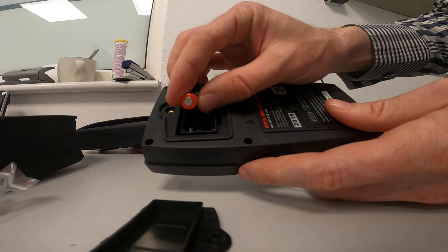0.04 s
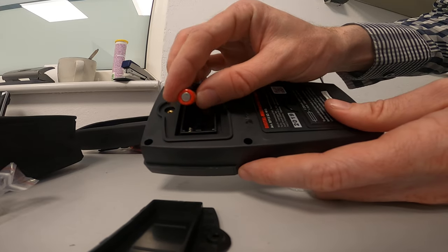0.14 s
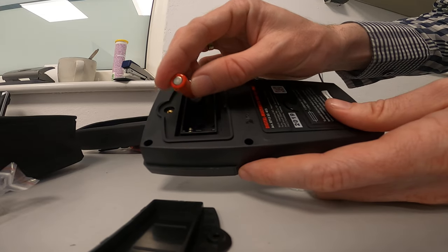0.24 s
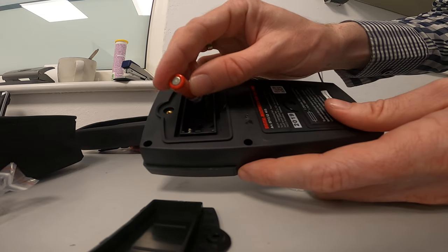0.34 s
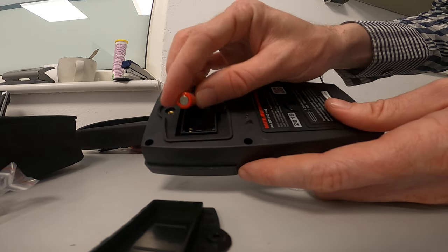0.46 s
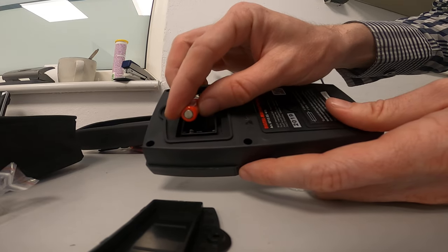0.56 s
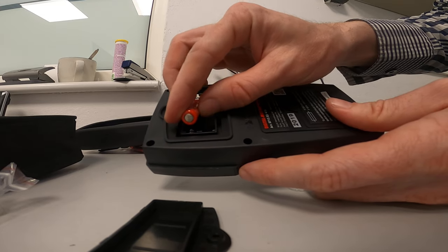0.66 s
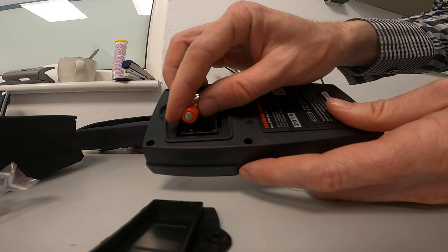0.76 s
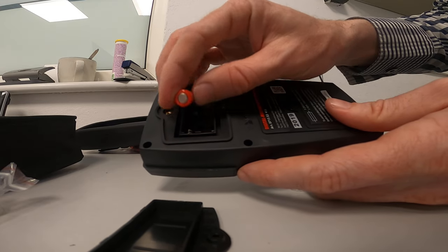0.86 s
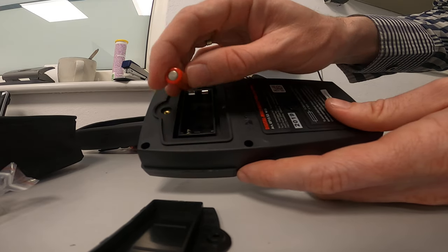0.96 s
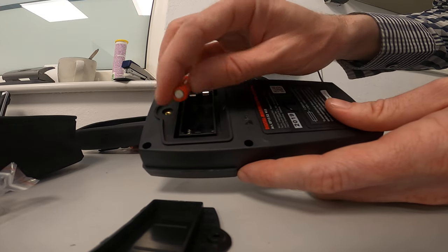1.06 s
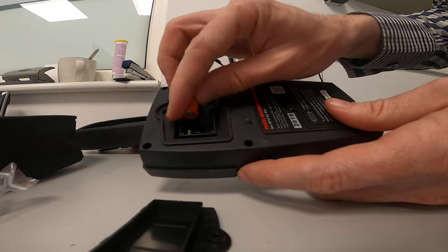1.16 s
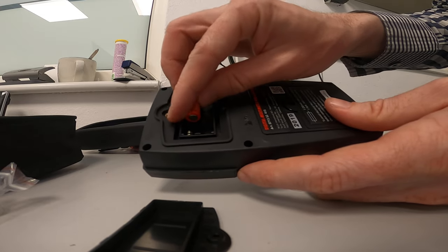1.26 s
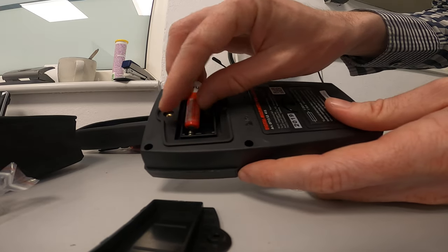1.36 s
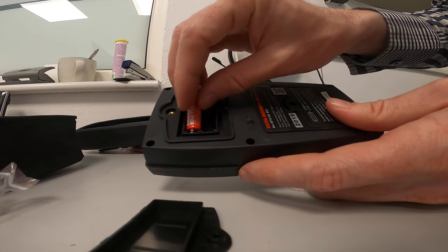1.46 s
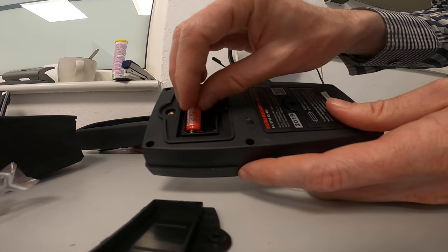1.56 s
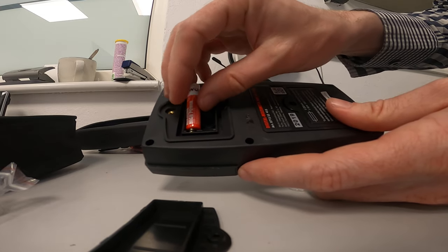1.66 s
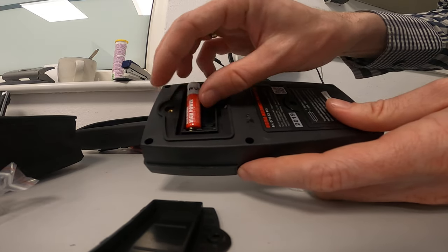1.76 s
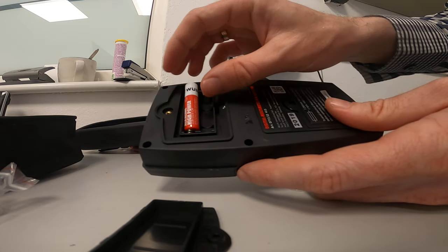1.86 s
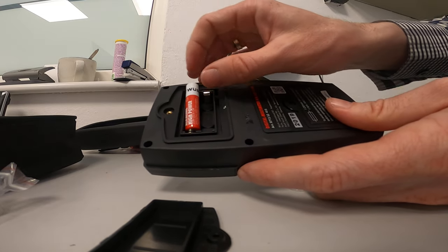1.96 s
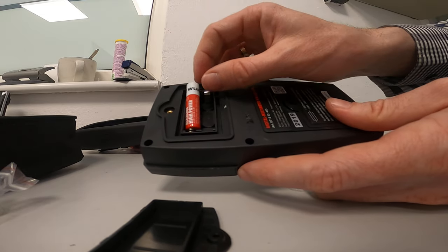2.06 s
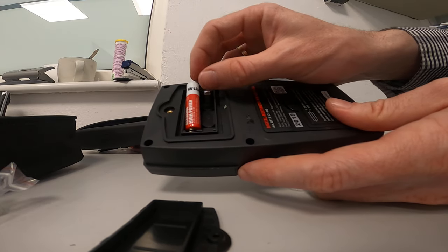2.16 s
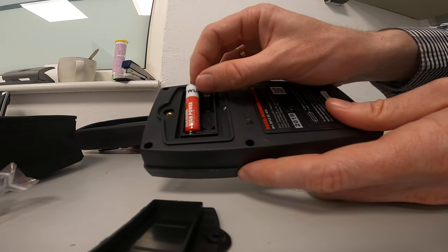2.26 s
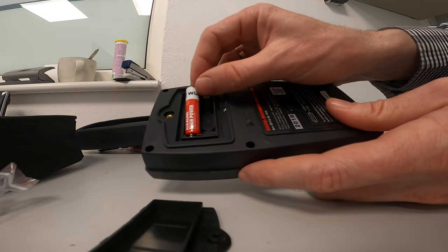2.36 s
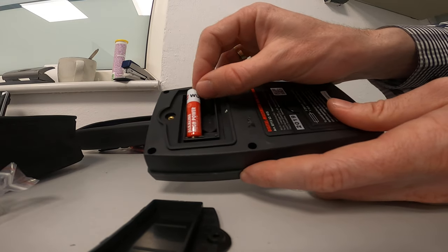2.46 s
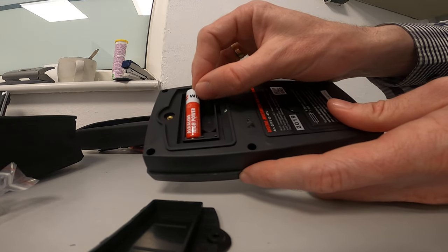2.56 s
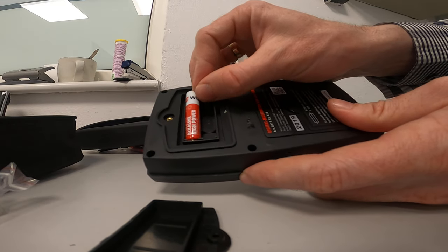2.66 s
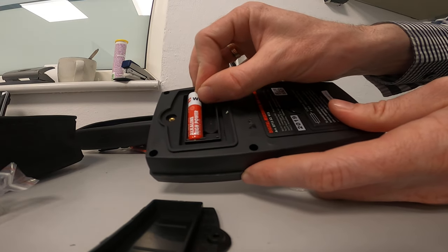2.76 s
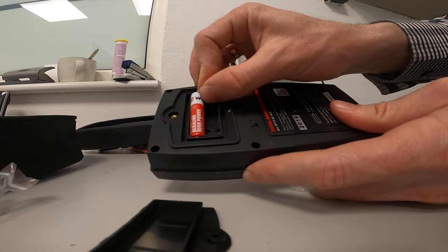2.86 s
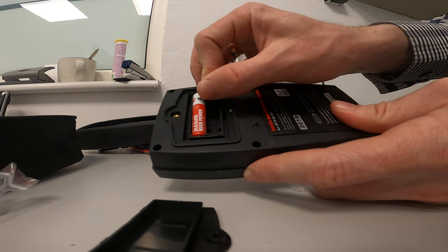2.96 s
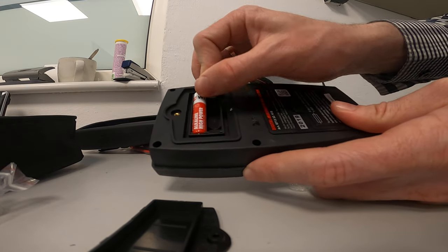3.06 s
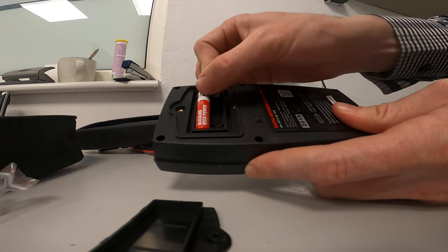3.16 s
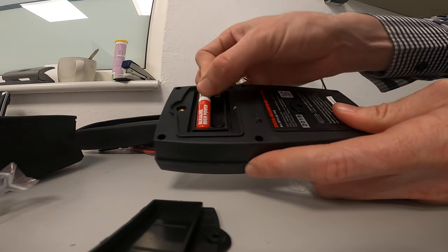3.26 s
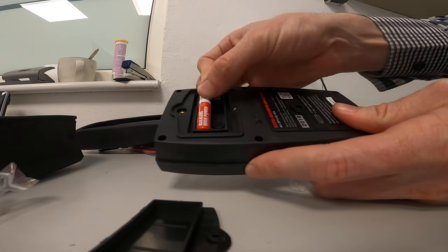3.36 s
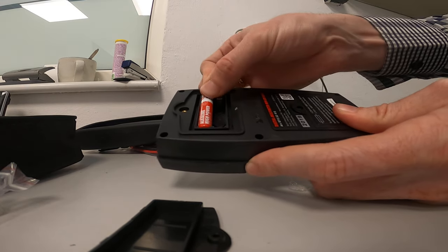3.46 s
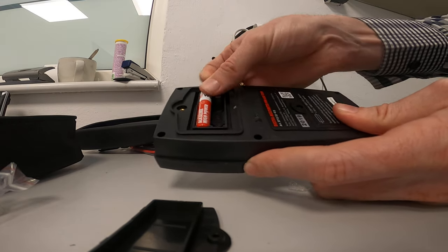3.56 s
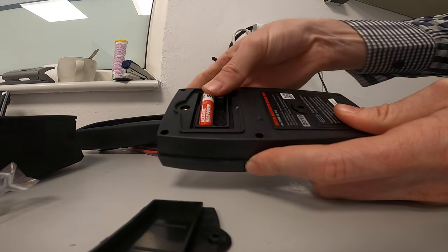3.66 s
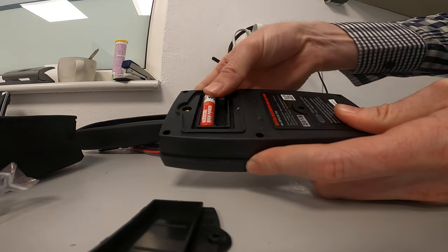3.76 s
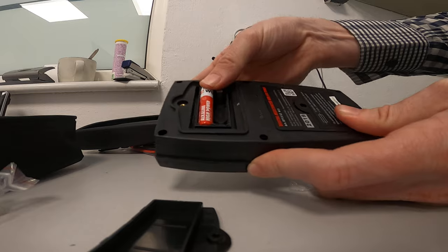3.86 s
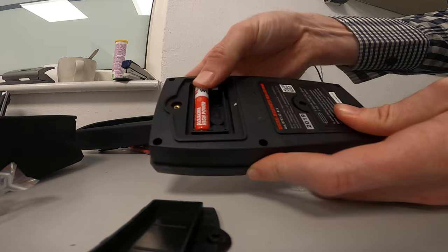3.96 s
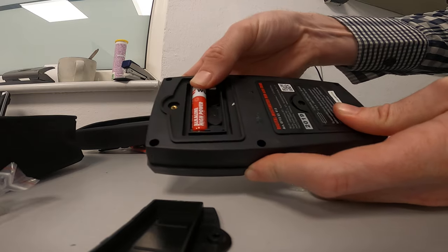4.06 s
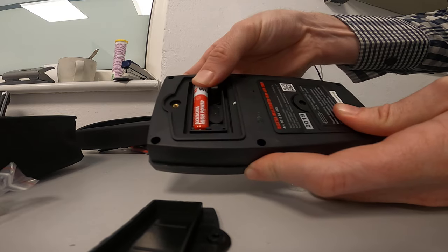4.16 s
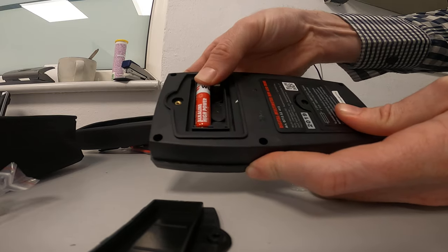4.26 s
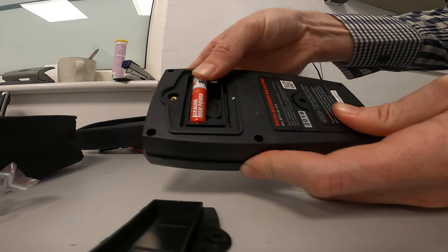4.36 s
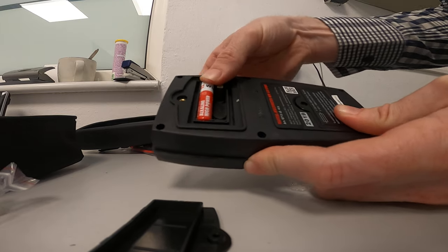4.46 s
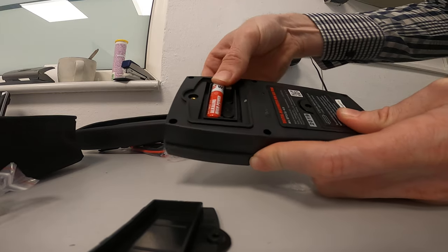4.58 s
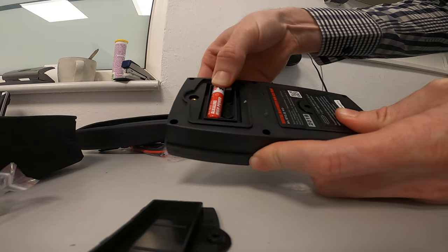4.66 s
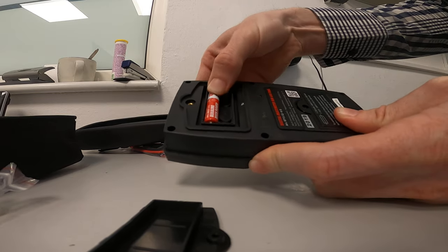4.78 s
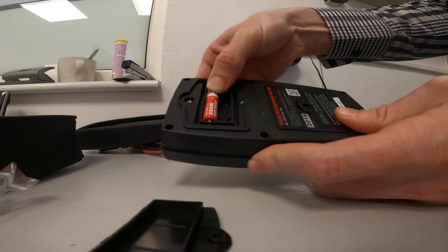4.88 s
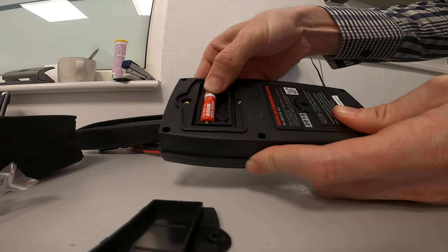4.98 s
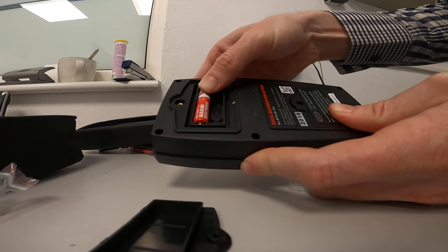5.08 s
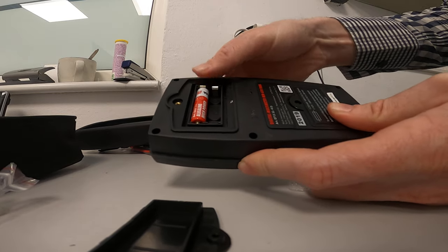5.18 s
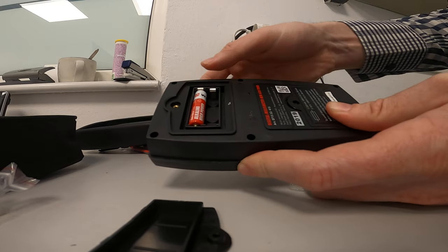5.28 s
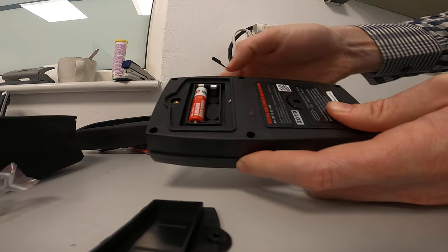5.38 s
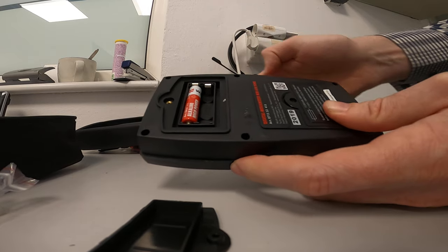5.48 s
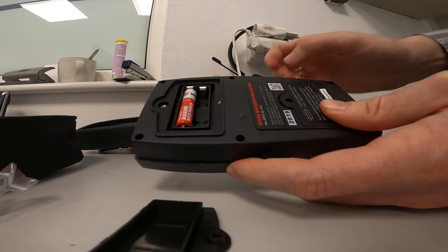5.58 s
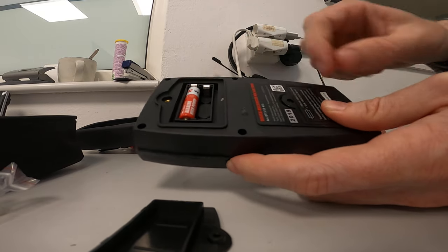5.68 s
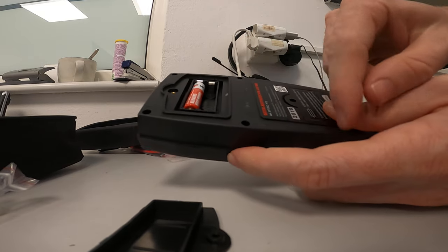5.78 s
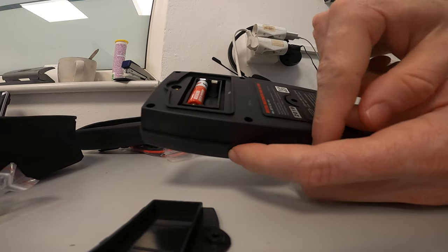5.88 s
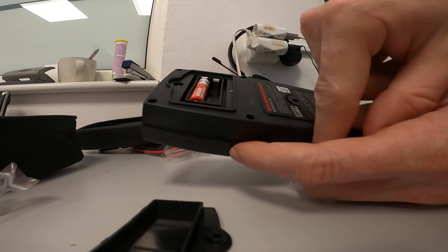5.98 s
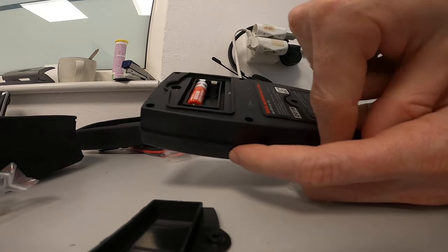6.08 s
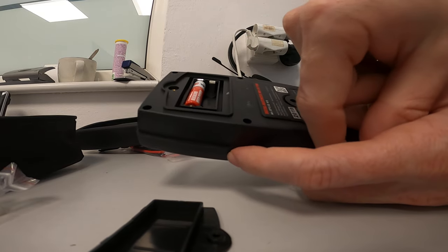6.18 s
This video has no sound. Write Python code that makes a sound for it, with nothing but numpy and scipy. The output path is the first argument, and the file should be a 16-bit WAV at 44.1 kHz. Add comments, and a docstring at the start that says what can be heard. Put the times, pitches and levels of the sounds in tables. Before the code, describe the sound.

A close stereo microphone in a small, hard room hears faint ventilation, a wavering low hum and soft rumble from hands on a plastic device. Light battery taps and faint scrapes open, until a brighter cluster of clicks at about 1 s. From 1.3 to 1.6 s come hollow knocks, gritty rubs and two or three firm clacks, then a hard clack at 1.85 s with a short slide. It is quieter until 2.7 s; moderate clicks follow near 2.95, 3.1 and 3.4 s. Small rubs and ticks continue around 4 s, with firmer clicks near 4.5 s and scraping to 4.8 s as rumble rises. At 4.87 s rapid slips grow into a huge dry snap at 4.91 s, with metallic edge and low desk thud. The background ducks, the room tail hangs for about half a second, then only sparse faint ticks and rubs remain, with rumble swelling after 5.6 s.

```python
"""A battery is tried in the compartment of a plastic handheld device, close to a camera on a desk in a small room.
Over faint ventilation, hum and hand rumble it taps and slides on the case, as struck modes and filtered noise,
and narrow bands of noise swell briefly. Shortly before 5 s a thumb pushes it along the spring in quick, growing
slips, and it seats with one sharp snap, which shakes the desk and ducks the camera's limiter, so the room's ring
seems to hang on after it. A few faint rubs and ticks of the hands follow while the rumble swells again."""
import sys
import numpy as np
from scipy import signal
from scipy.fft import rfft, irfft
from scipy.io import wavfile
from scipy.ndimage import uniform_filter1d, minimum_filter1d

SR = 44100
rng = np.random.default_rng(int(sys.argv[2]) if len(sys.argv) > 2 else 0)


def inscribe(sig):
    """Save sig as 16-bit PCM at rate SR to the path in sys.argv[1].

    A 1-D sig is mono; a 2-D sig holds one channel per row.
    Samples are clipped to [-1, 1] before scaling.
    """
    pcm = np.round(np.clip(np.atleast_2d(sig).T, -1, 1) * 32767)
    wavfile.write(sys.argv[1], SR, pcm.astype(np.int16))


N = 274743
TIME = np.arange(N) / SR

# Walls of the plastic case. Each row: mode in Hz, energy in dB, t60 in seconds.
CASE_MODES = [(362.7, -7, .012), (540, -13, .031), (700, 1, 0.14), (758, -4, 0.22), (866, -6, 0.011),
              (1018, -1.5, .025), (1105, 0.5, 0.03), (1210, -2.5, .035), (1350, -6, 0.02),
              (1505, -1.5, 0.023), (1670, -2.5, 0.026), (1765, -3, .02), (2054, -0.5, 0.018),
              (2245, -5, .02), (2615, -5, 0.02), (2854, 0, 0.02), (3130, -3, 0.013), (3580, -1.5, 0.015),
              (3882, -3, 0.022), (4243, -2, 0.023)]


def undb(db):
    """Decibels to gain."""
    return 10 ** (np.asarray(db) / 20)


def unit(x):
    """Scale to rms 1."""
    return x / np.sqrt(np.mean(x ** 2))


def strong(y):
    """Scale to the energy of 10 ms at rms 1."""
    return y * np.sqrt(SR / 100 / np.sum(y ** 2))


def add(track, s, sound):
    """Mix a sound into a track at time s."""
    i = int(s * SR)
    track[..., max(i, 0):i + sound.shape[-1]] += sound[..., max(-i, 0):N - i]


def colour(x, points):
    """Filter by (Hz, dB) points, joined by straight lines over log frequency."""
    hz, db = np.transpose(points)
    f = np.maximum(np.fft.rfftfreq(x.shape[-1], 1 / SR), 1)
    gain = undb(np.interp(np.log(f), np.log(hz), db))
    return irfft(rfft(x) * gain, x.shape[-1])


def fade(t, t60):
    """Exponential decay by 60 dB in t60 seconds."""
    return np.exp(-np.log(1000) * t / t60)


def bell(t, length):
    """A level that swells and dies around the middle of t."""
    return np.exp(-2 * ((t - t.mean()) / length) ** 2)


def ring(modes, weights, scatter_db, detune, in_step=.4, size=6144):
    """Struck modes; each contact point shifts their shares and pitches and flips a few."""
    hz, db, t60 = np.transpose(modes)[:, :, None]
    t = np.arange(size) / SR
    share, shift, side = rng.standard_normal((3, len(modes), 1))
    polarity = np.sign(side + in_step)
    gain = weights * undb(db + scatter_db * share) * polarity / np.sqrt(t60)
    tones = np.sin(2 * np.pi * hz * (1 + detune * shift) * t)
    return strong(np.sum(gain * fade(t, t60) * tones, axis=0))


def outline(x, modes, weights):
    """Colour x with the smooth outline of a set of modes, without the notches between them."""
    hz, db, _ = np.transpose(modes)
    db = db + 20 * np.log10(np.ravel(weights))
    below = (hz[0] / 2, db[0] - 22.5)
    above = [(hz[-1] * 1.3, db[-1] - 20.0), (hz[-1] * 3, db[-1] - 45.0)]
    return strong(colour(x, [below, *zip(hz, db), *above]))


def reach(centre_hz, spread):
    """Share of each case mode in a contact: soft ones reach the low modes, hard ones the high."""
    octaves = np.log2(np.array(CASE_MODES)[:, :1] / centre_hz)
    return (1 + octaves ** 2 / (3.1 * spread ** 2)) ** -1.5


def effort(ease_s=0.18):
    """Rise of the rumble in dB, easing in and out of each movement of the hands."""
    # The hands move or press. Each row: start in seconds, end in seconds, rise of the rumble in dB.
    moves = [(0, .9, 3), (3.69, 4.9, 5), (5.599, 6.3, 4.5)]
    held = sum(db * ((TIME >= start) & (TIME < end)) for start, end, db in moves)
    return uniform_filter1d(1. * held, int(ease_s * SR))


def background(air_db=-73, wander_db=1.8, rest_db=-51.5, grip_db=-57, grip_growth=1.4):
    """Faint ventilation with a wavering hum, and the rumble of hands holding the case on the desk."""
    # Ventilation before its bass is trimmed. Each row: frequency in Hz, density in dB per Hz.
    air_shape = [(12, -29.5), (20, -1.5), (140, -9.5), (171, -12), (202, -16), (393, -28), (452, -36),
                 (565, -39), (725, -35.5), (932, -38.5), (1670, -40.5), (1820, -37), (2400, -44.5),
                 (4200, -54.5), (7730, -56), (10500, -77), (15500, -98)]
    # Steady lines of the hum. Each row: frequency in Hz, rms level in dB.
    hum_lines = [(147, -62.5), (197, -65.5), (506, -83), (743, -83)]
    # Colour of the hand rumble. Each row: frequency in Hz, gain in dB.
    rumble_shape = [(15, -4.5), (30, 0), (62, 0), (85, -10), (150, -14), (230, -29), (400, -39),
                    (1000, -72)]
    mid, side = rng.standard_normal((2, N))
    side = colour(side, [(100, -15.5), (600, -1.0), (2500, 0)]) * np.array([[1], [-1]])
    air = colour(colour(mid + side, air_shape), [(90, -15.5), (220, -4.0)])
    # the level counts only what lies above 400 Hz
    air *= undb(air_db) / np.std(colour(air.mean(axis=0), [(350, -80), (400, 0)]))
    hum = 0
    for hz, db in hum_lines:
        waver = unit(colour(rng.standard_normal(N), [(4, -2.0), (12, -9.0), (60, -62.5)]))
        hum = hum + undb(db) * unit((1 + .5 * waver) * np.sin(2 * np.pi * hz * TIME))
    # the rumble also swells and sinks by chance
    wander = unit(colour(rng.standard_normal(N), [(4, 1), (8, -11), (30, -71)]))
    rise = effort() + wander_db * wander
    shared = undb(rest_db + rise) * unit(colour(rng.standard_normal(N), rumble_shape))
    # the gripping hand is on the right and grows faster with effort
    grip = undb(grip_db + grip_growth * rise) * unit(colour(rng.standard_normal(N), rumble_shape))
    return air + hum + np.array([shared, shared + grip])


def room(x, build_s=0.0055, left_db=1, right_db=-1):
    """Diffuse echoes, dying sooner in the high treble; long waves reach both ports alike."""
    # Echo bands, before the balance of the ports. Each row: centre in Hz, echo level in dB, t60 in seconds.
    echo_bands = [(150, -9.5, .5), (342, -2.5, 0.68), (654, -8, 0.64), (940, -12.5, .66),
                  (1190, -17.5, .62), (1630, -13, .69), (2040, -16.5, .64), (2400, -20, .6),
                  (3740, -19, 0.57), (4500, -26, 0.69), (5030, -13, .55), (5800, -8.5, .55),
                  (6600, -18, .48), (7500, -19, 0.44), (9000, -29, 0.35), (14970, -30.5, 0.34)]
    hz, db, t60 = np.transpose(echo_bands)
    t, f = np.arange(SR) / SR, np.maximum(np.fft.rfftfreq(SR, 1 / SR), 1)
    mid, side = rfft(rng.standard_normal((2, SR)))
    alike = np.sinc(f / 4500)
    opposite = np.array([[1], [-1]]) * side * np.sqrt(1 - alike)
    field = (mid * np.sqrt(1 + alike) + opposite) / np.sqrt(2)
    echo = 0
    for k, band in enumerate(np.eye(len(hz))):
        shape = fade(t, t60[k]) * (1 - np.exp(-(t / build_s) ** 2))
        noise = irfft(field * np.interp(np.log(f), np.log(hz), band), SR)
        echo = echo + noise * undb(db[k]) * shape / np.linalg.norm(shape)
    wet = signal.fftconvolve(x[None], echo, axes=1)[:, :N]
    return wet * undb([[left_db], [right_db]])


def desk(snap_s=4.9095, sway_left_db=-4.0, jolt_s=4.9135, jolt_hz=135, jolt_db=11, jolt_width_s=.0036,
         left_share=0.06, seat_hz=420, seat_db=2, seat_t60=0.012):
    """Pushes rock the desk; the snap also jolts the camera with one short thud, mostly on the right."""
    # Modes of the desk. Each row: frequency in Hz, level in dB, t60 in seconds.
    desk_modes = [(31.04, -3, 0.24), (64.5, -4.5, 0.18), (100.2, -8, 0.07)]
    # Knocks passed through the hand into the desk. Each row: start in seconds, gain of the sway in dB.
    pushes = [(.02, -40), (2.951, -35), (3.377, -34), (3.69, -41.5), (3.979, -34), (4.07, -38),
              (4.512, -38), (4.545, -35.5), (4.91, 3.5), (5.698, -39)]
    out, t = np.zeros((2, N)), np.arange(SR // 2) / SR
    sway = sum(undb(db) * fade(t, t60) * np.sin(2 * np.pi * hz * t) for hz, db, t60 in desk_modes)
    for s, db in pushes:
        add(out, s, -undb(db) * sway)
    # the battery's whole mass hits the bottom of its bay with a low knock
    add(out, snap_s, undb(seat_db) * fade(t, seat_t60) * np.sin(2 * np.pi * seat_hz * t))
    since = TIME - jolt_s
    jolt = np.exp(-(since / jolt_width_s) ** 2) * np.cos(2 * np.pi * jolt_hz * since)
    return out * undb([[sway_left_db], [0]]) + undb(jolt_db) * jolt * np.array([[left_share], [1]])


def narrow_bands():
    """Narrow bands of noise, each swelling and dying around its middle."""
    # Each row: middle in seconds, length in seconds, centre in Hz, width in Hz, level in dB.
    noise_bands = [(0.529, 0.003, 2800, 500, -61.5), (.56, 0.042, 2900, 900, -75),
                   (.6, 0.022, 2020, 600, -64.5), (.945, 0.05, 1060, 127, -62.5),
                   (1.514, 0.014, 8500, 1800, -63), (1.56, .02, 8500, 1600, -56),
                   (1.795, 0.018, 8400, 1197, -65.5), (1.92, 0.0224, 8740, 1585, -59.5),
                   (2.68, 0.11, 390, 220, -64.5), (4.294, .03, 950, 450, -63),
                   (4.902, 0.016, 7940, 121, -40.5), (5.98, 0.084, 1050, 300, -65.5),
                   (6.0, 0.057, 12500, 4000, -78)]
    out, t = np.zeros(N), np.arange(SR // 3) / SR
    f = np.fft.rfftfreq(len(t), 1 / SR)
    for s, length, hz, width_hz, db in noise_bands:
        swell = bell(t, length)
        band_gain = 1 / (1 + (2 * (f - hz) / width_hz) ** 2)
        noise = irfft(rfft(rng.standard_normal(len(t))) * band_gain, len(t))
        add(out, s - t.mean(), undb(db) * unit(swell * noise) * np.sqrt(np.mean(swell ** 2)))
    return out


def rubs(slips_per_s=1700, uneven_db=2.8, grain_db=3.0, spread=0.61, hiss_left_db=-2, hiss_right_db=2):
    """Uneven tiny slips ring the case while the skin hisses; each stroke swells and dies."""
    # Battery and fingers sliding on the case. Each row: middle in seconds, length in seconds,
    # scrape level in dB, centre of colour in Hz, hiss level in dB before the balance of the ports.
    strokes = [(0.341, 0.043, -64, 1690, -87), (0.645, 0.0067, -50.5, 2100, -77),
               (0.65, 0.04, -60.5, 1700, -92), (0.993, 0.061, -57, 1780, -70),
               (1.517, 0.012, -44, 1150, -72), (1.557, 0.025, -44, 1100, -71),
               (1.82, 0.048, -57.5, 1470, -68), (1.922, 0.033, -50, 1700, -67),
               (2.601, 0.021, -64, 2080, -76.5), (2.731, 0.02, -53.5, 1200, -78),
               (2.955, 0.009, -44, 900, -68.5), (3.095, 0.011, -50.5, 1490, -68),
               (3.404, 0.081, -61, 970, -71), (3.677, 0.012, -51, 3010, -57), (3.684, 0.036, -58, 900, -68),
               (3.903, 0.016, -52.5, 1050, -68), (3.961, 0.091, -59.5, 1500, -73),
               (4.076, 0.02, -54, 950, -70), (4.295, 0.039, -65, 1344, -75.5),
               (4.49, 0.018, -56.5, 1296, -68), (4.547, 0.022, -51.5, 895, -64),
               (4.67, 0.055, -52.5, 1800, -64), (4.761, 0.046, -52.5, 1200, -69.5),
               (5.49, 0.13, -67, 1795, -77), (5.326, 0.021, -67, 1500, -70),
               (5.987, 0.12, -66.5, 1196, -74.5)]
    # Colour of skin and label friction. Each row: frequency in Hz, gain in dB.
    skin_shape = [(1500, -23), (3000, -9.5), (4500, 5), (6500, -1), (8300, 1.5), (10000, -12.5),
                  (13000, -22.5), (16000, -15)]
    out = np.zeros((2, N))
    t = np.arange(SR // 3) / SR
    for s, length, scrape_db, centre_hz, hiss_db in strokes:
        stroke = bell(t, length)
        pressure = undb(uneven_db * unit(colour(rng.standard_normal(len(t)), [(60, 1), (250, -40)])))
        size = pressure * undb(grain_db * np.minimum(rng.exponential(size=len(t)), 3.5))
        lets_go = rng.random(len(t)) < slips_per_s / SR
        slips = lets_go * size * np.sign(rng.standard_normal((2, len(t))))
        # the contact point wanders, so the slips take the broad colour of the case
        body = outline(slips[0], CASE_MODES, reach(centre_hz, spread))
        body = colour(body, [(2300, 0.5), (4000, -7.0)])
        skin = colour(unit(slips) + rng.standard_normal(slips.shape), skin_shape)
        hiss = undb(hiss_db) * unit(stroke * skin) * undb([[hiss_left_db], [hiss_right_db]])
        scrape = undb(scrape_db) * unit(stroke * body)
        add(out, s - t.mean(), (scrape + hiss) * np.sqrt(np.mean(stroke ** 2)))
    return out


def knocks():
    """The hollow of the case rings on after the battery lands squarely."""
    # Hollow inside of the case. Each row: mode in Hz, energy in dB, t60 in seconds.
    hollow_modes = [(527.7, -7.5, .13), (700, -5, .18), (777, -6, .2), (926, -1.5, .13), (1055, -10, 0.17),
                    (1170, -5.5, .07), (1380, -9, 0.056), (1500, -13, .12)]
    # Square landings. Each row: start in seconds, level in dB over 10 ms.
    landings = [(1.341, -36.5), (1.449, -48), (1.541, -41), (1.853, -37.5), (2.954, -51), (3.372, -39.5),
                (3.977, -57)]
    out = np.zeros(N)
    for s, db in landings:
        add(out, s, undb(db) * ring(hollow_modes, 1, scatter_db=0.6, detune=.002, size=11025))
    return out


def pings(split_hz=45):
    """The struck spot of battery, spring or bay rings as a close pair of modes that beat."""
    # Each row: start in seconds, pitch in Hz, level of the stronger mode in dB, t60 in seconds.
    struck_spots = [(.003, 5410, -50, .12), (.003, 1840, -42.5, .02), (.1137, 2020, -43.5, .02),
                    (0.346, 5700, -64, 0.063), (0.9695, 1896, -29, 0.031), (0.9698, 2870, -32, 0.038),
                    (0.9694, 5200, -44.5, 0.048), (1.57, 1180, -26.5, 0.028), (1.57, 3860, -32.5, .028),
                    (1.853, 3200, -34.5, .016), (1.854, 3780, -31, 0.043), (1.853, 4400, -37, 0.045),
                    (1.853, 6680, -49, .08), (2.9542, 3940, -43, 0.011), (3.106, 1170, -27, 0.028),
                    (3.1057, 2630, -32.5, .011), (3.3718, 2540, -36.5, .011), (3.3716, 10140, -35, 0.0058),
                    (4.5047, 2920, -33, 0.011)]
    out, t = np.zeros(N), np.arange(SR // 2) / SR
    for s, hz, db, t60 in struck_spots:
        pair = np.sin(2 * np.pi * hz * t) + 0.47 * np.sin(2 * np.pi * (hz + split_hz) * t)
        add(out, s, undb(db) * fade(t, t60) * pair)
    return out


def contacts(held_t60_s=0.97, pressed_t60_s=0.02, faint_per_s=2.4, faint_db=-69.5, faint_range_db=2,
             faint_hz=1405, faint_tick_db=-15):
    """Every touch of the battery: single clicks, the snap with the slips before it, and faint ticks at random."""
    # Battery against case. Each row: start in seconds, level in dB, centre of colour in Hz,
    # metal tick in dB relative to that level.
    taps = [(0.0033, -48, 2600, -7), (0.1137, -51, 1520, -10.5), (0.3015, -60, 1320, -32),
            (0.3457, -51, 1650, -12), (0.623, -59, 1550, -40), (0.6732, -57, 1770, -43),
            (0.76, -62, 1540, -48), (0.9695, -35, 1640, -13), (0.9819, -37, 1710, -10),
            (0.9882, -36, 1630, -20), (1.0508, -53, 1860, -6.5), (1.34, -38.5, 1120, -34.5),
            (1.345, -43.5, 1150, -54), (1.4485, -40, 1330, -22), (1.467, -59.5, 1700, -7),
            (1.481, -56.5, 1460, -10), (1.5225, -43, 1308, -11), (1.5406, -23, 1100, -33),
            (1.5484, -26.5, 1170, -33), (1.57, -23.5, 1840, -26), (1.81, -60, 2200, 0.5),
            (1.843, -52, 2600, -18), (1.853, -20, 2050, -27), (2.278, -69, 2296, -12),
            (2.397, -61, 718, -25.5), (2.602, -60.5, 2300, -17.5), (2.731, -50.5, 1150, -32),
            (2.772, -58.5, 1260, -37), (2.8732, -67, 2710, 8.5), (2.9512, -43, 1200, -21.5),
            (2.9543, -39, 1080, -21), (3.0548, -49, 1100, -37), (3.084, -50, 1200, -25),
            (3.1057, -34.5, 1810, -19), (3.213, -56.5, 1090, -44.5), (3.3088, -57, 1122, -19),
            (3.3718, -34, 1410, -8), (3.5651, -58.5, 1524, -10.5), (3.733, -63.5, 1690, -10),
            (3.902, -52, 1200, -25), (3.909, -56, 1394, -16), (3.9757, -43.5, 2100, -10.5),
            (4.074, -53, 1200, -16.5), (4.0815, -51.5, 1307, -18.5), (4.489, -46.5, 1240, -33),
            (4.5054, -40, 1540, -7), (4.5122, -35.5, 1260, -21), (4.5379, -40.5, 1900, -7.5),
            (4.749, -54, 1242, -16), (4.7656, -48, 1310, -12.5), (4.7823, -48.5, 1200, -26),
            (5.542, -57, 1840, -15), (5.6983, -63, 1703, -14), (5.8324, -65, 1522, -15.5),
            (6.22, -60.5, 1609, -12)]
    # It slips over the contact in steps, each louder than the one before.
    # Each row: start in seconds, level in dB, centre of colour in Hz, metal tick in relative dB.
    slip_steps = [(4.867, -54.5, 2200, -7.5), (4.8775, -50.5, 2197, -8), (4.8882, -36.5, 2780, -8.5),
                  (4.899, -28, 2700, -9.5), (4.9068, -18.5, 1406, -13)]
    snap = (4.9095, 2.5, 2250, -6)  # the battery seats; columns as above
    # the grip shifts
    faint = [(N / SR * when, faint_db + faint_range_db * (2 * size - 1), faint_hz, faint_tick_db)
             for when, size in rng.random((int(faint_per_s * N / SR), 2))]
    # the thumb pressing the battery home damps the walls far more than a light hold
    pressed = [(*row, pressed_t60_s) for row in [*slip_steps, snap]]
    return pressed + [(*row, held_t60_s) for row in [*taps, *faint]]


def clicks(tick_left_db=-1.5, tick_right_db=3.0, case_db=-1, crack_db=-10, crack_t60=0.028, smooth_db=-2.5,
           ringing_db=-4, contact_s=0.00054, even_tick_db=-10, tilt_db=13, spread_oct=0.9, doubling_db=22.5):
    """Each contact rings the walls of the case and ticks the metal: (straight path, sound sent into the room)."""
    # Metal cap and spring contact. Each row: mode in Hz, energy in dB, t60 in seconds.
    metal_modes = [(4800, 0.5, 0.01), (5312, -2.5, 0.013), (6300, -4, 0.021), (6800, -0.5, 0.0054),
                   (7430, 0, 0.011), (7797, -1, 0.0072), (8780, -6.5, 0.015), (9820, -7.5, 0.0081),
                   (11300, -12.5, 0.0065), (12630, -22, .005), (14700, -23.5, .005)]
    case, tick, spread_out = np.zeros(N), np.zeros((2, N)), np.zeros(N)
    t = np.arange(6144) / SR
    press = 1 - np.exp(-(t / contact_s) ** 2)  # the force takes a moment to build
    impulse = signal.unit_impulse(len(t), "mid")
    for s, db, centre_hz, tick_db, hand_t60 in contacts():
        # a harder contact ticks more and spreads wider
        weights = reach(centre_hz, spread_oct * 2 ** (tick_db / doubling_db))
        walls = ring(CASE_MODES, weights, scatter_db=2.0, detune=0.0033) * fade(t, hand_t60)
        walls = undb(case_db) * strong(walls)
        # countless small modes fill the gaps between the strong ones
        crack = outline(rng.standard_normal(len(t)), CASE_MODES, weights) * fade(t, crack_t60)
        crack = undb(crack_db) * strong(crack)
        # a weak tick is also a dull one
        tilt = min((tick_db - even_tick_db) / tilt_db, .5)
        shine = (np.array(metal_modes)[:, :1] / 6500) ** tilt
        metal = np.array([ring(metal_modes, shine, scatter_db=0.5, detune=0.034) for _ in range(2)])
        # a soft contact lasts longer and gives no treble; the small case radiates little bass
        contact = [(centre_hz / 6.5, -20), (centre_hz / 2.3, 0), (3.5 * centre_hz, 0),
                   (6 * centre_hz, -13), (8 * centre_hz, -28)]
        body = np.concatenate([np.zeros(len(t)), walls + crack])  # silence, then the blow
        add(case, s - len(t) / SR, undb(db) * colour(body, contact))
        add(tick, s, undb(db + tick_db) * press * metal)
        # summed over all directions the colour is smooth and broader
        smooth_case = undb(smooth_db) * outline(impulse, CASE_MODES, weights ** 0.74)
        smooth_tick = undb(tick_db) * outline(impulse, metal_modes, np.ones(len(metal_modes)))
        add(spread_out, s - t.mean(), undb(db) * (smooth_case + smooth_tick))
    # the short waves of the tick favour the right-hand port
    straight = case + tick * undb([[tick_left_db], [tick_right_db]])
    return straight, spread_out + undb(ringing_db) * case


def scene(left_db=0.0, right_db=1.3, hollow_room_db=-7):
    """The device is a little to the right: the left port hears it two samples later and softer."""
    struck, spread_out = clicks()
    swells = narrow_bands() + rubs()
    hollow, spots = knocks(), pings()
    near = struck + swells + hollow + spots
    direct = np.array([np.roll(near[0], 2) * undb(left_db), near[1] * undb(right_db)])
    carried = colour(spots, [(3900, -8), (5400, 3)])  # the high rings of the free battery carry furthest
    into_room = spread_out + swells.mean(axis=0) + undb(hollow_room_db) * hollow + carried
    return direct + room(into_room) + desk() + background()


def record(dry, ceiling_db=1.4, release_db_per_s=84, deepen=0.37, settle_s=0.0076, top_hz=15800):
    """A look-ahead limiter drops at once on the snap, sinks further as it settles and recovers; the top is cut."""
    over = np.maximum(20 * np.log10(np.abs(dry).max(axis=0) + 1e-9) - ceiling_db, 0)
    over = -minimum_filter1d(-over, size=65)  # widen each peak so the drop comes ahead of it
    recovery = release_db_per_s * TIME
    duck = uniform_filter1d(np.maximum.accumulate(over + recovery) - recovery, size=65)
    keep = np.exp(-1 / (settle_s * SR))
    duck = duck + deepen * signal.lfilter([1 - keep], [1, -keep], duck)
    top_cut = signal.ellip(10, .2, 80, top_hz, fs=SR, output="sos")
    return signal.sosfilt(top_cut, dry * undb(-duck))


dry = scene()
out = record(dry)
inscribe(out)
```